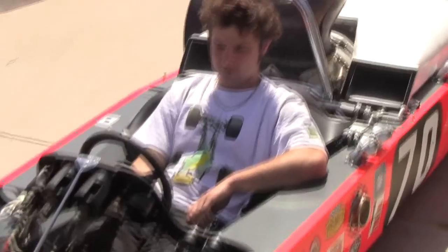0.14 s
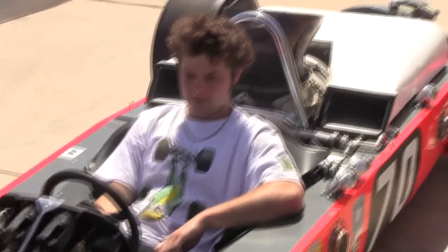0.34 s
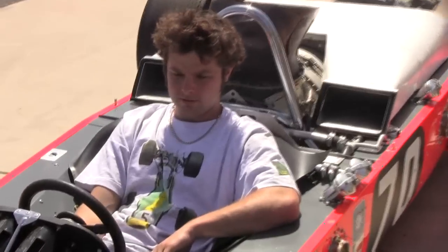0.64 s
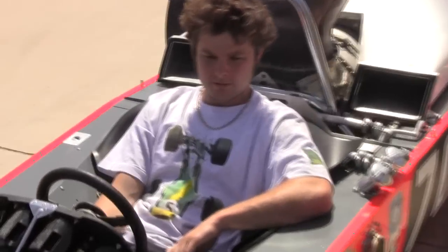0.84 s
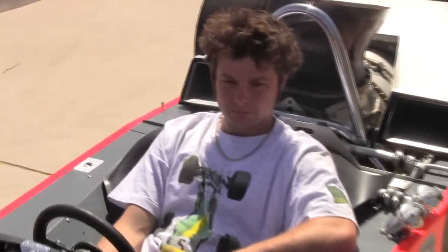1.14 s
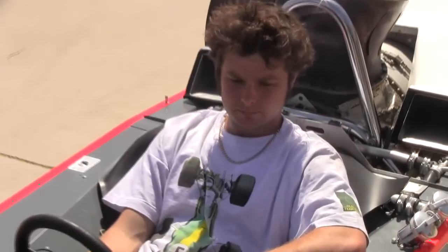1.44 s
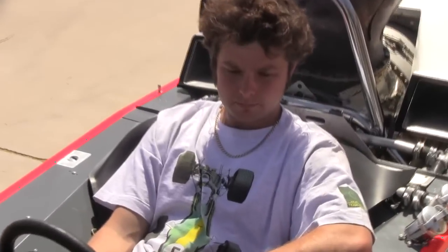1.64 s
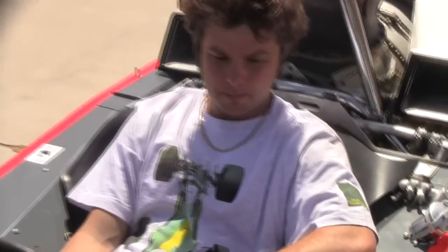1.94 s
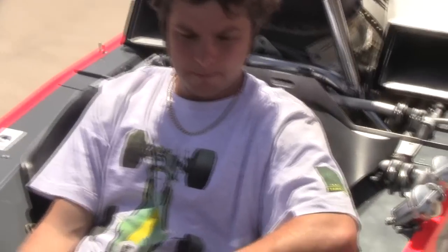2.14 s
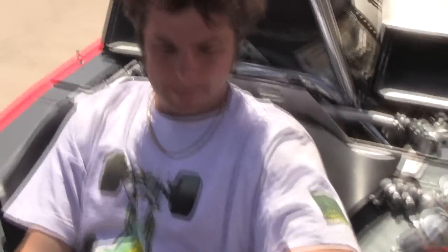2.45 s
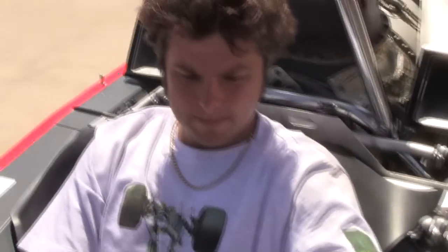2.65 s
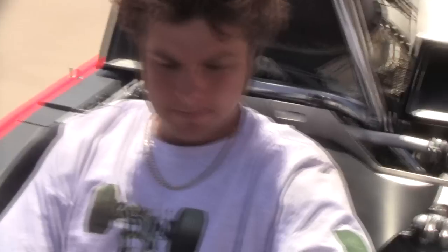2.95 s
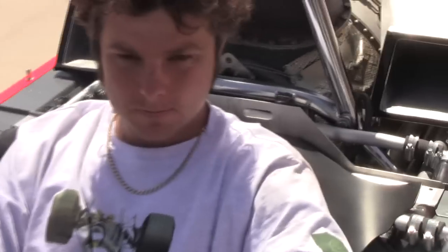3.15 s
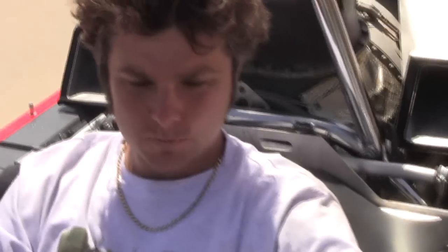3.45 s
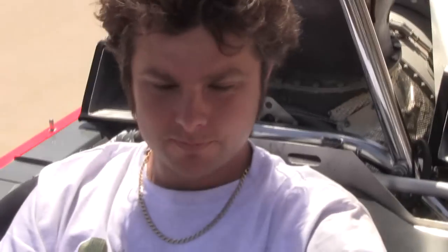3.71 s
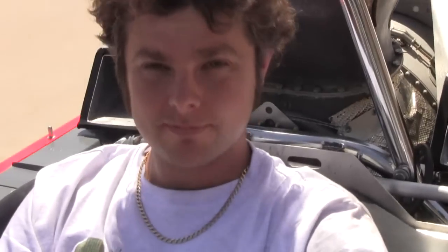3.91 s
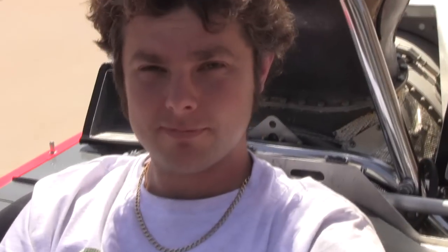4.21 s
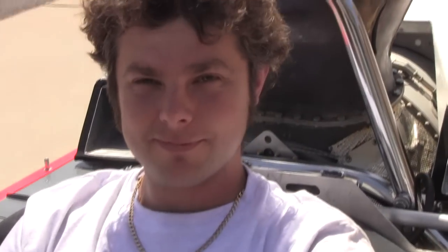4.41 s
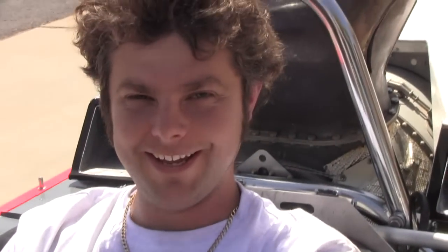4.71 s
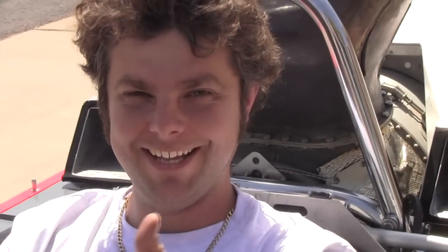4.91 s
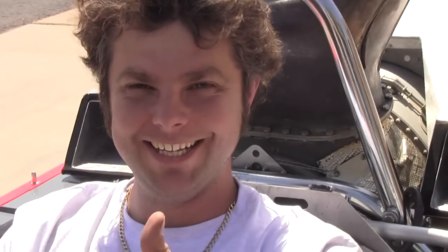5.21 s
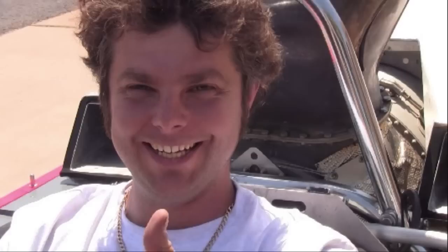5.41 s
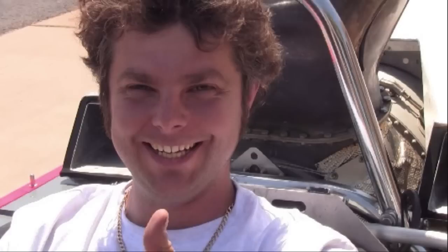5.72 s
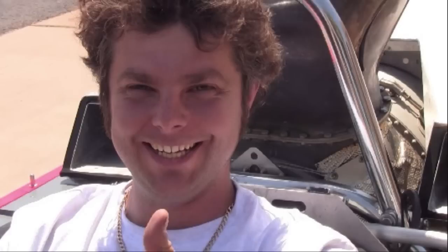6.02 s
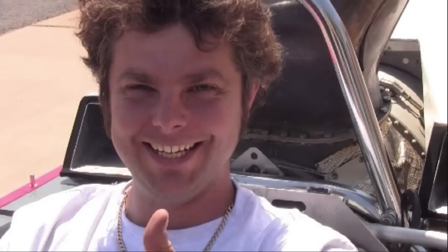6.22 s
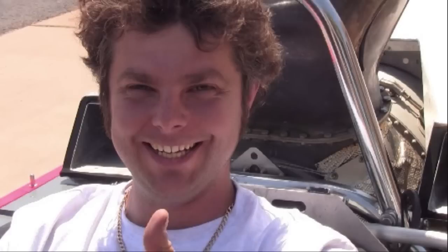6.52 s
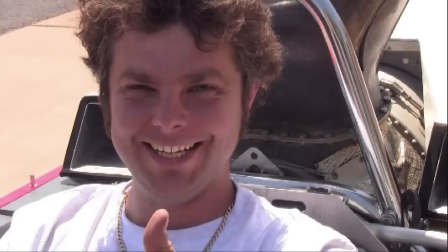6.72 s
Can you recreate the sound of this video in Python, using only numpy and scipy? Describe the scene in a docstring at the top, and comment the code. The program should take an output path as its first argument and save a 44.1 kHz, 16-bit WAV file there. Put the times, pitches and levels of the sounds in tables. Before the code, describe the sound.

Outdoors and very close, a race car's small turbine coasts down after shut-off. A piercing, slightly rough whine with bright overtones slides smoothly lower over broad rushing air and a faint low hum, swelling and rippling as it goes. Near the end hard cuts drop the level, repeat the low whine a little louder, then jump to a much higher, falling one. Close stereo microphone, no speech.

```python
"""In the open, close by, a small gas turbine coasts down in four stretches joined by hard cuts.
Blade tones, a gear tone and low shaft orders are sines locked to one shaft angle; as they glide,
resonances swell them and echoes make them ripple. Air rushing through the ducts is filtered noise
whose registers follow the speed. Two close microphone ports differ in level and phase."""
import sys
import numpy as np
from scipy import signal
from scipy.fft import rfft, irfft
from scipy.io import wavfile

SR = 44100
rng = np.random.default_rng(int(sys.argv[2]) if len(sys.argv) > 2 else 0)


def generate_wav(signal):
    """Clip the signal to [-1, 1] and save it as 16-bit WAV at the path in sys.argv[1]."""
    frames = np.transpose(np.atleast_2d(signal))
    scaled = np.clip(frames, -1, 1) * 32767
    pcm = np.round(scaled).astype(np.int16)
    wavfile.write(sys.argv[1], SR, pcm)


def magnitude_from_level(level_db):
    """Linear magnitude for a level in decibels (20 dB per decade)."""
    exponent = np.asarray(level_db, float) / 20
    return 10 ** exponent


N = 302525
MIDDLE_HZ = 120   # shaft speed from which octaves of speed are counted

# blade tone and overtones 2-7: gain at middle speed [level/dB]
BLADE_DB = [-0.25, -0.25, -0.1, -1, -5.5, -4, -13]
# the same tones: change with speed [level/dB per octave]
BLADE_FOLLOWS_DB = [-1, 1, 0.5, 2.5, 0, 7, 6]
# inlet resonances, one table each for the blade tone and overtones 2, 3, 4:
# centre [f/Hz], full width at half amplitude [f/Hz], rms of a passing tone before its gain [level/dB]
INLET = [
    [(1473, 9, -33.8), (1523, 6, -32.5), (1584, 43, -32.5), (1655, 20, -33.0), (1694, 23, -33.5),
     (1763, 40, -31.1), (1798, 19, -34.4), (1852, 17, -35.4), (1897, 21, -34.0), (1985, 25, -38),
     (2086, 28, -34.1), (2159, 37, -28.2), (2410, 50, -39), (2492, 43, -37.2), (2611, 96, -35.6)],
    [(2945, 10, -33), (2966, 14, -29.5), (2998, 18, -24.7), (3029, 21, -24.2), (3224, 60, -27.4),
     (3295, 45, -32), (3350, 20, -31.1), (3400, 34, -31.3), (3466, 36, -28.7), (3507, 28, -29.2),
     (3570, 43, -30.2), (3632, 40, -30.9), (3690, 35, -31), (3760, 42, -33.5), (3790, 25, -29),
     (3833, 39, -25.3), (3905, 40, -31), (3971, 44, -28.8), (4019, 47, -32.1), (4110, 62, -27.2),
     (4220, 51, -30.7), (4284, 35, -31.4), (4350, 35, -33), (4440, 58, -27.4), (4568, 50, -31.7),
     (4653, 50, -30.5), (4720, 40, -33), (4800, 50, -33), (4887, 67, -31.8), (5020, 80, -36),
     (5170, 63, -31.9), (5391, 154, -29.6)],
    [(4466, 23, -37.9), (4560, 20, -37), (4944, 184, -27.9), (5048, 142, -31.9), (5170, 70, -34),
     (5383, 131, -33.0), (5780, 110, -37), (6106, 145, -30.8), (6268, 51, -32.1), (6336, 98, -31.8),
     (7100, 74, -37.7), (7297, 37, -34.9), (7950, 200, -39), (8387, 162, -36.8)],
    [(5881, 12, -39.3), (5912, 26, -38.2), (5969, 25, -39.4), (6000, 23, -35.1), (6030, 21, -34.1),
     (6059, 21, -35.5), (6089, 15, -39.0), (6377, 60, -35.7), (6527, 48, -38.7), (6620, 47, -34.8),
     (6680, 38, -39.0), (7000, 100, -38), (7279, 108, -38.5), (7465, 161, -34.5), (7620, 70, -37),
     (7907, 106, -38.9), (8130, 90, -37), (8387, 167, -37.3), (8809, 103, -39.3), (9010, 124, -34.4),
     (9242, 155, -37.7), (9729, 20, -32.6), (10016, 149, -39.4), (10428, 214, -39.4)],
]


def blade_whine(speed, angle):
    """Blade-passing harmonics: sixteen blades give multiples of 16 turns, swelled by inlet resonances."""
    blades = 16
    octaves = np.log2(speed / MIDDLE_HZ)
    out = np.zeros((2, N))
    for k, (db, follows_db) in enumerate(zip(BLADE_DB, BLADE_FOLLOWS_DB)):
        turns = (k + 1) * blades
        inlet = path(INLET[k] if k < len(INLET) else [])
        size = passing_size(turns * speed, db + follows_db * octaves, inlet)
        # short waves stray more
        out += tone(turns * angle, size, rough=0.17, rough_hz=25.0, stray=0.05 * (k + 1))
    return out


def gear_song(speed, angle, body):
    """Gear tone: a fixed ratio to the shaft, with a strong noisy skirt."""
    ratio, gain_db = 8.19, 0.65
    size = passing_size(ratio * speed, gain_db, body)
    return tone(ratio * angle, size, rough=0.37, rough_hz=38)


# shaft orders 1-4: gain [level/dB]
SHAFT_DB = [0.1, 0.1, 0.092, 0.1]


def shaft_hum(speed, angle, body):
    """Shaft orders: whole multiples of the rotation, swelled by body resonances."""
    out = np.zeros((2, N))
    for order, db in enumerate(SHAFT_DB, start=1):
        size = passing_size(order * speed, db, body)
        out += tone(order * angle, size, rough=0.15, rough_hz=7.7)
    return out


# body resonances, for hum and gear tone:
# centre [f/Hz], full width at half amplitude [f/Hz], rms of a passing tone before its gain [level/dB]
BODY = [(94.5, 5, -51), (137, 17.2, -37.5), (160.5, 37, -43.5), (191.6, 8, -42.5), (211.6, 20.3, -35),
        (267, 29, -36), (290.7, 14.5, -36), (306.8, 21, -38), (345, 30, -52), (417, 28, -42),
        (428, 14, -45), (522, 14, -41), (566, 56, -38), (860, 38, -39), (888, 34, -33.5), (940, 49, -39),
        (1054, 64, -45), (1145, 37, -38), (1285, 25, -36)]


def rotor(speed):
    """Phase locking: every tone follows the one shaft angle, the integral of speed."""
    angle = 2 * np.pi * np.cumsum(speed) / SR
    body = path(BODY)
    hum = shaft_hum(speed, angle, body)
    return hum + gear_song(speed, angle, body) + blade_whine(speed, angle)


def tone(turns, size, rough, rough_hz, stray=0.):
    """Random modulation: turbulence shakes a sine's size and phase into a noisy skirt, one copy a port."""
    shake = 1 + rough * (drift(rough_hz) + 1j * drift(rough_hz))
    start = rng.uniform(0, 2 * np.pi)
    wave = np.sqrt(2) * size * shake * np.exp(1j * (turns + start))
    # a wandering side path reaches the right port only
    detour = 1 + stray * (drift(3.1) + 1j * drift(2.0))
    return np.real([wave, wave * detour])


def passing_size(pitch_hz, gain_db, sizes):
    """Transfer function: a gliding tone takes the size of the pitch it passes (sizes at 0, 1, 2.. Hz)."""
    return magnitude_from_level(gain_db) * np.interp(pitch_hz, np.arange(len(sizes)), sizes)


# a tone away from the resonances: f/Hz, rms before echoes and gain [level/dB]
BETWEEN = [(90, -58), (200, -49.5), (350, -56), (470, -64), (700, -47), (1050, -49.5), (1400, -43.5),
           (2000, -41.5), (2350, -45.5), (3000, -37), (4000, -36.5), (5000, -41.5), (6000, -41.5),
           (7000, -39.5), (9000, -41.5), (11000, -45.5), (14000, -44.5), (15700, -53)]


def path(swells):
    """Resonance and interference: resonances swell a tone; between them echoes beat into ripples and nulls."""
    phase_step = 2.01   # radians between neighbouring resonances: they partly cancel where they overlap
    early_s, late_s = .004, .03   # span of the delays from ground and bodywork
    echo_share = 0.15   # how deeply the echoes also ripple a swell
    hz = np.arange(SR // 2.)
    rung = 0
    for k, (centre, width, db) in enumerate(swells):
        bell = .5 ** ((2 * (hz - centre) / width) ** 2)
        rung = rung + magnitude_from_level(db) * bell * np.exp(1j * k * phase_step)
    lag, phase = rng.random((2, 6, 1))   # six echoes
    delay_s = early_s + (late_s - early_s) * lag
    echoes = np.exp(2j * np.pi * (hz * delay_s + phase)).sum(axis=0) / np.sqrt(len(lag))
    between = magnitude_from_level(at_hz(*np.transpose(BETWEEN), hz)) * echoes
    return np.hypot(np.abs(rung * (1 + echo_share * echoes)), np.abs(between))


# cuts between the stretches [t/s]
CUTS_S = [4.667, 5.069, 5.569]
# shaft speed as each stretch begins [f/Hz]
START_HZ = [152.33, 94.76, 95.32, 175.32]


def speed_hz():
    """Power-law drag: in each stretch the loss of speed grows as a power of the speed."""
    sag_hz_per_s, sag_at_hz, drag_power = 8.0576, 100, 1.76756   # loss at 100 Hz, and its power
    stretch = stretch_index()
    start = np.take(START_HZ, stretch)
    since = np.arange(N) / SR - np.take([0, *CUTS_S], stretch)
    bend = drag_power - 1
    slowing = bend * sag_hz_per_s / sag_at_hz * (start / sag_at_hz) ** bend * since
    return start * (1 + slowing) ** (-1 / bend)


def stretch_index():
    """Piecewise time: the number of the stretch, 0-3, at each sample."""
    return np.searchsorted(CUTS_S, np.arange(N) / SR)


# basic air noise, before registers, ducts and flow level: f/Hz, density [level/dB per Hz]
AIR = [(40, -100), (80, -83.5), (130, -71.5), (250, -69), (400, -72.5), (650, -67), (1250, -67.5),
       (1900, -68), (2600, -65), (4000, -66.5), (5000, -66.5), (7500, -78), (11000, -80), (14800, -85.5),
       (15700, -96)]
# air flow by register: centre [f/Hz], gain at middle speed [level/dB],
# slope [dB per octave of speed], bend [dB per octave squared]
REGISTERS = [(60, 3.2, -9, -1), (130, 1.9, 11, -3), (320, 3, -3.5, 13), (696, 1, 12.5, -23),
             (1020, 2, -6.5, -3.5), (2000, 2, 1, -12), (4100, 2, -1.5, -12.5), (6640, 1, 9, -10),
             (10000, 1.2, 7, -9)]


def air(speed, flicker_db=0.36):
    """Broadband flow noise: two unrelated noises whose overlapping registers follow the speed."""
    hz = np.fft.rfftfreq(N, 1 / SR)
    density = magnitude_from_level(at_hz(*np.transpose(AIR), hz)) * np.sqrt(SR / 2)
    noise = rfft(rng.standard_normal((2, N))) * density
    octaves = np.log2(speed / MIDDLE_HZ)
    centres_hz = np.transpose(REGISTERS)[0]
    plain = np.zeros((2, N))
    for share, (_, db, slope_db, bend_db) in zip(np.eye(len(REGISTERS)), REGISTERS):
        level_db = db + slope_db * octaves + bend_db * octaves ** 2 + flicker_db * drift(3.3)
        plain += irfft(noise * at_hz(centres_hz, share, hz), N) * magnitude_from_level(level_db)
    return duct_colour(plain, speed)


# duct and body colour: centre [f/Hz], full width at half the dB [f/Hz], gain when fully ducted [level/dB]
DUCTS = [(493, 39, -4), (560, 130, 6), (680, 79, 6), (950, 28, 6), (1106, 86, 2.5), (1232, 65, -8),
         (1353, 89, 3), (1980, 400, 6), (2335, 185, -7), (2764, 110, -4.5), (2990, 240, -5),
         (3480, 25, 6.5), (3950, 110, 1), (4028, 49, 7.5), (4144, 66, 5), (4620, 220, 3), (5050, 100, 3.5),
         (5430, 820, -6.5)]


def duct_colour(plain, speed):
    """Resonant filtering: ducts colour all the air below 103 Hz shaft speed and none above 183 Hz."""
    hz = np.fft.rfftfreq(N, 1 / SR)
    ducts_db = sum(db / (1 + (2 * (hz - centre) / width) ** 2) for centre, width, db in DUCTS)
    ducted = np.interp(speed, (103, 183), [1, 0])
    return (1 - ducted) * plain + ducted * irfft(rfft(plain) * magnitude_from_level(ducts_db), N)


# gain of the air flow, one table a stretch: t/s, level/dB
LEVEL = [
    [(0.0, -0.6), (0.8, -0.2), (1.5, 0.5), (1.9, -0.5), (2.3, 0.06), (2.8, 0.6), (3.3, 0.9), (3.8, 0.46),
     (4.3, 0.2), (4.667, -1.4)],
    [(4.667, -6.5), (5.069, -7)],
    [(5.069, -2.5), (5.3, -4.5), (5.569, -5)],
    [(5.569, -5.5), (6.2, -6), (6.86, -6.5)],
]


def air_level_db():
    """Amplitude envelope: straight lines in dB, each stretch's curve heard up to its cut."""
    t = np.arange(N) / SR
    curves = [np.interp(t, *np.transpose(rows)) for rows in LEVEL]
    return np.choose(stretch_index(), np.array(curves))


# ports: f/Hz, left over right [level/dB], left lead [phase/rad]
PORTS = [(100, -.7, -.06), (400, -2.3, .05), (650, -2.4, .3), (900, 1.4, .42), (1300, .2, .1),
         (2600, .1, .1), (3500, -3, .33), (4500, -6, .7), (5200, -9.6, 1.45), (6000, -6.4, 2.35),
         (6600, -.5, 2.75), (7600, 1.2, 2.5), (8500, 2.2, 2.7), (9500, 5.5, 3.33), (11200, 13.5, 3.8),
         (15000, 20, 4.1)]
# likeness of the air noise at the two ports: f/Hz, correlation [0-1]
LIKENESS = [(30, .3), (100, 1), (900, 0.93), (2600, 0.94), (5200, 0.92), (6500, 0.97), (9500, 0.91),
            (11200, 0.7), (15000, .5)]


def ports(tones, noise):
    """Interchannel coherence: the right port shifts level and phase, its noise partly unrelated."""
    hz = np.fft.rfftfreq(N, 1 / SR)
    points_hz, *columns = np.transpose(PORTS)
    over_db, lead = (at_hz(points_hz, c, hz) for c in columns)
    alike = np.clip(at_hz(*np.transpose(LIKENESS), hz), 0, 1)
    shared, other = rfft(noise)
    right = rfft(tones[1]) + alike * shared + np.sqrt(1 - alike ** 2) * other
    left = tones[0] + noise[0]
    return np.array([left, irfft(right * magnitude_from_level(-over_db) * np.exp(-1j * lead), N)])


def at_hz(points_hz, values, hz):
    """Logarithmic frequency scale: straight lines between the points on it."""
    return np.interp(np.log(hz + 1), np.log(points_hz), values)


def drift(rate):
    """Low-pass random process: noise of spread 1 through two equal poles at rate Hz."""
    hop = 40   # samples between the coarse draws
    r = np.exp(-2 * np.pi * rate * hop / SR)
    coarse = rng.standard_normal(N // hop + 2002)
    slow = signal.lfilter([1], [1, -2 * r, r * r], coarse)[2000:]   # the filter has settled
    return np.interp(np.arange(N) / hop, np.arange(len(slow)), slow / slow.std())


# gain of all rotor tones in each stretch [level/dB]
TONES_DB = [0.03, -7.5, -4.5, -6]


def scene():
    """Superposition: rotor tones and air flow reach the two ports."""
    speed = speed_hz()
    tones = magnitude_from_level(np.take(TONES_DB, stretch_index())) * rotor(speed)
    flow = magnitude_from_level(air_level_db()) * air(speed)
    return ports(tones, flow)


def low_pass(x):
    """Removes everything above the highest recorded frequency."""
    return signal.sosfilt(signal.butter(12, 15890, fs=SR, output="sos"), x)


def record(dry):
    """Signal chain: the finished mix passes through its last stage."""
    return low_pass(dry)


dry = scene()
out = record(dry)
generate_wav(out)
```